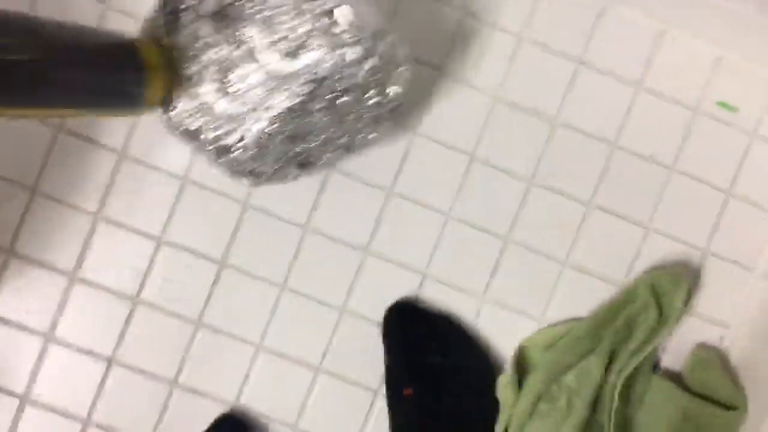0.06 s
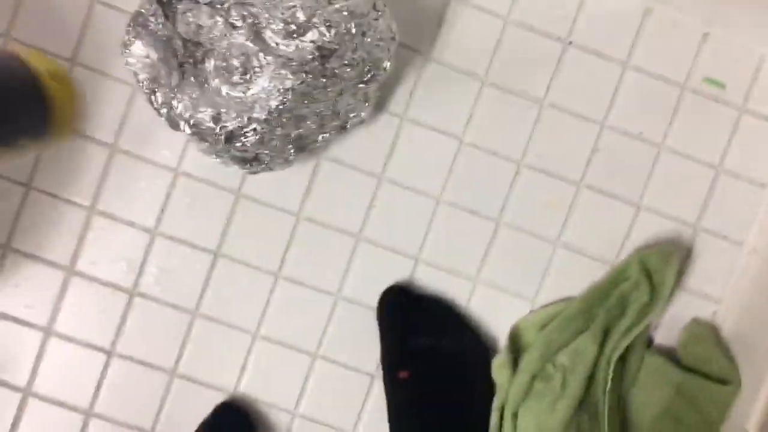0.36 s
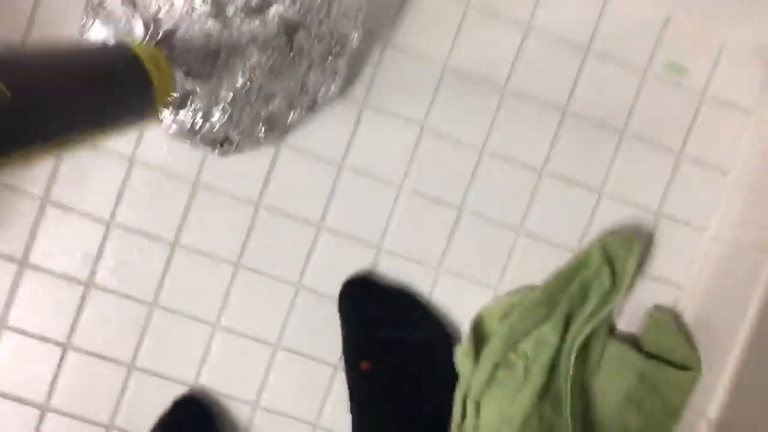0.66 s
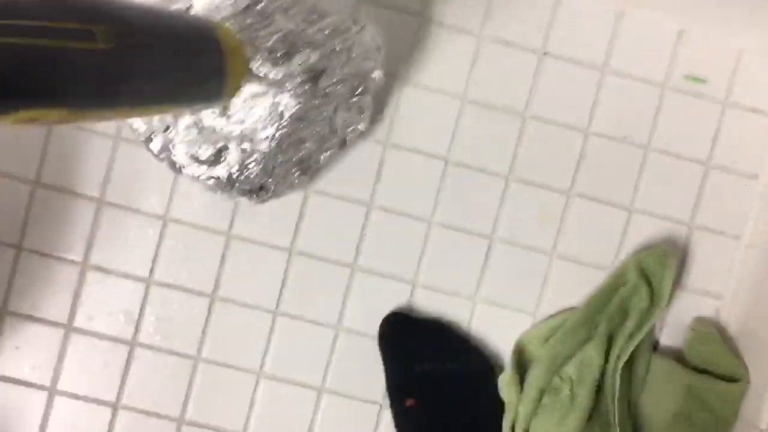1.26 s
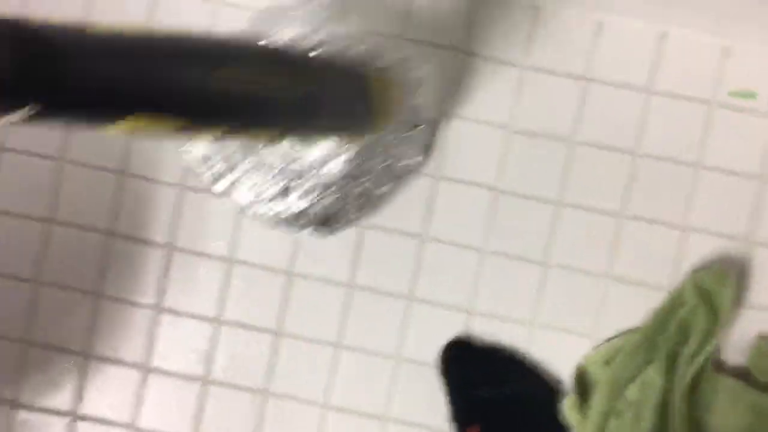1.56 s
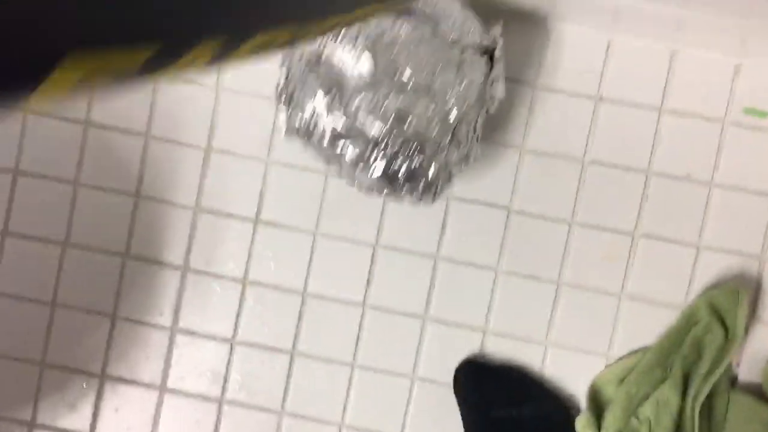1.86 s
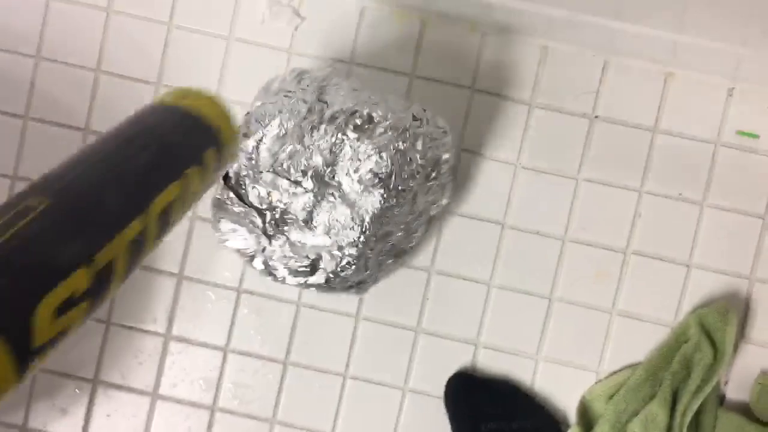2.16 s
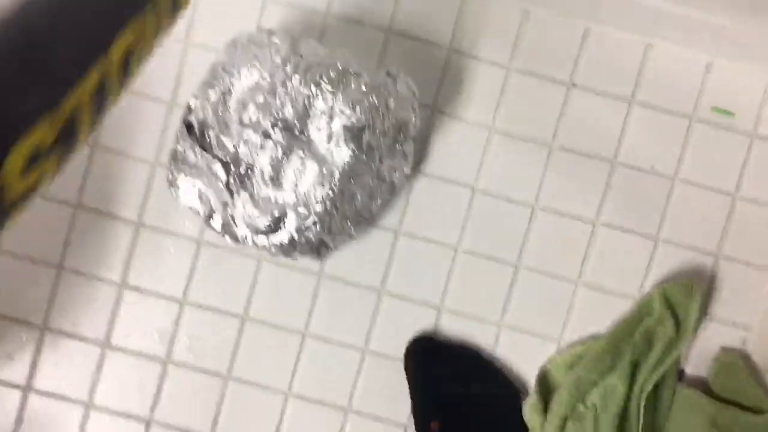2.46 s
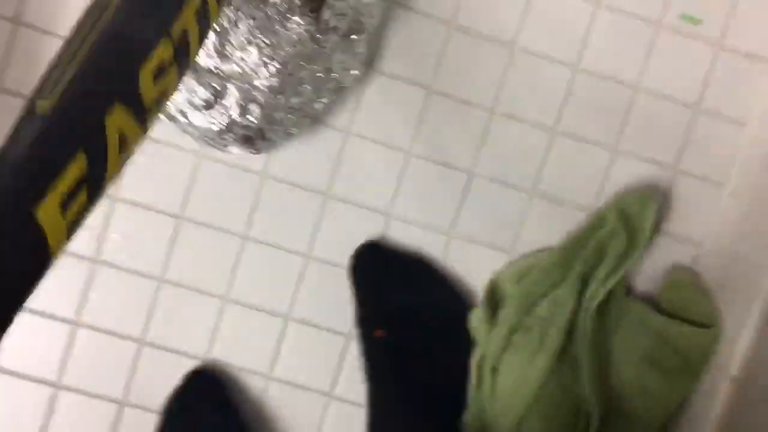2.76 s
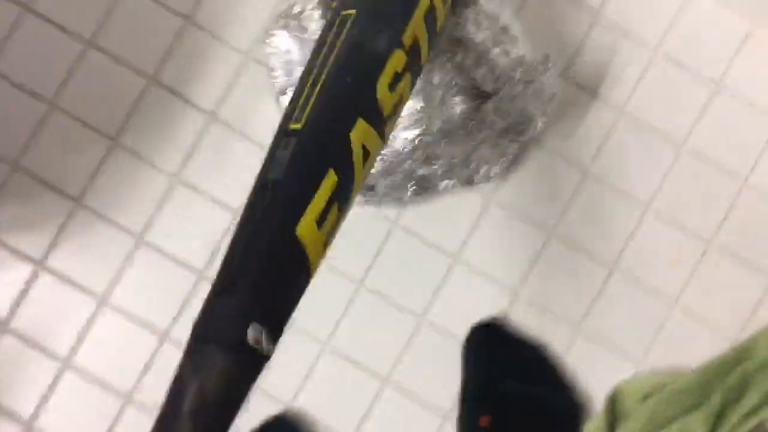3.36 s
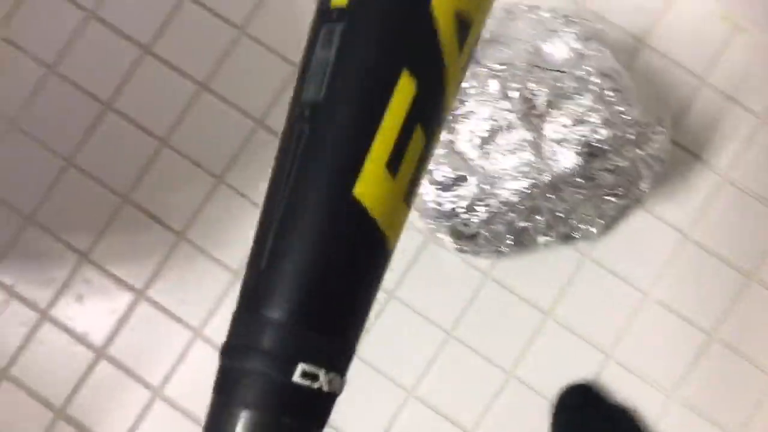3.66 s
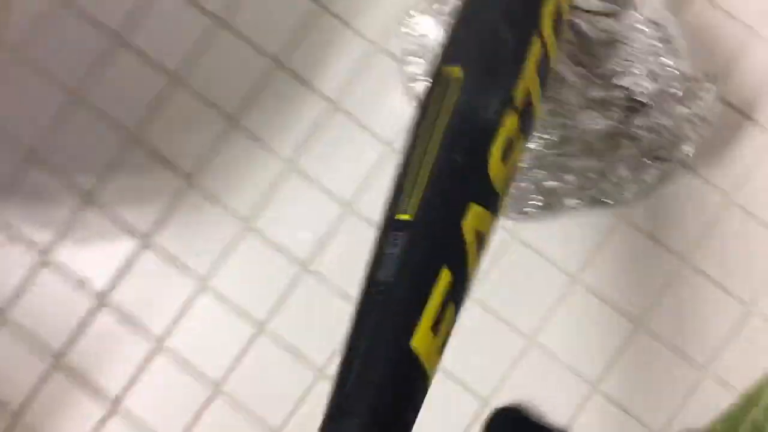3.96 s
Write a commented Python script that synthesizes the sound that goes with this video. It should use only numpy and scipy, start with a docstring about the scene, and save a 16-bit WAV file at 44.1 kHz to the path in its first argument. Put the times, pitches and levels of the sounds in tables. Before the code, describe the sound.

A bat hits a crumpled foil ball seven times on a tiled floor.

```python
"""In a small, hard, tiled room, a bat knocks a big ball of crumpled foil about on the floor.
Each blow crushes a few milliseconds' worth of creases and draws a hollow thud from the ball and the room.
Between blows the ball scrapes, rolls and tips over onto its flat sides, and single creases snap.
The bat rings briefly on the last three blows. A few soft hoots and a quiet rumble lie underneath."""
import sys
import numpy as np
from scipy import signal
from scipy.fft import rfft, irfft
from scipy.io import wavfile

SR = 44100
rng = np.random.default_rng(int(sys.argv[2]) if len(sys.argv) > 2 else 0)


def dump(signal):
    """Clip the signal to [-1, 1] and save it as 16-bit WAV at the path in sys.argv[1]."""
    limited = np.clip(np.atleast_2d(signal).T, -1, 1)
    pcm = np.round(limited * 32767).astype(np.int16)
    wavfile.write(sys.argv[1], SR, pcm)


N = 176400
T = np.arange(N) / SR


def amp(db):
    """Turn decibels into a number to multiply by."""
    return 10 ** (np.asarray(db) / 20)


def unit(x):
    """Scale a sound to an average (rms) size of 1."""
    return x / np.sqrt(np.mean(x ** 2) + 1e-20)


def at_hz(table, hz):
    """Look up a frequency in a table, sliding between rows by octaves."""
    freqs, values = np.array(table, float).T
    return np.interp(np.log(np.maximum(hz, 1)), np.log(freqs), values)


def curve(table):
    """A volume that follows a table of (time [s], level [dB])."""
    return amp(np.interp(T, *np.array(table, float).T))


def fade(t, fade_s):
    """Die away by 60 dB in the fade time."""
    return np.exp(-np.log(1000) * t / fade_s)


def add(out, x, start):
    """Mix a sound in at its start time."""
    i = int(np.clip(start * SR, 0, N - 1))
    out[i:i + len(x)] += x[:N - i]


def colour(x, spectrum, tilt=0, size=4096):
    """Give a sound the tone of a table; tilt adds that many dB per octave above 500 Hz."""
    hz = np.maximum(np.fft.rfftfreq(size, 1 / SR), 1)
    gain = amp(at_hz(spectrum, hz) + tilt * np.log2(np.maximum(hz, 500)))
    # fold the filter so that it never rings before the sound arrives
    cepstrum = irfft(np.log(gain))
    cepstrum[1:size // 2] *= 2
    cepstrum[size // 2 + 1:] = 0
    response = irfft(np.exp(rfft(cepstrum)))
    return signal.fftconvolve(x, response / np.linalg.norm(response))


def clicks(n, per_s, spread_db):
    """Many tiny snaps of uneven size at random moments."""
    snaps = (rng.random(n) < per_s / SR) * np.sign(rng.standard_normal(n))
    sizes = amp(spread_db * np.clip(rng.standard_normal(n), -2, 2))
    return unit(snaps * sizes)


def ringing(notes, rise_s):
    """Fading notes of something struck, a little different in level and pitch each time."""
    t = T[:SR // 2]
    ring = 0
    for hz, db, fade_s in notes:
        louder, higher, phase = rng.standard_normal(3)
        tone = np.sin(2 * np.pi * (hz * (1 + 0.0039 * higher) * t + phase))
        ring += amp(db + 1.5 * louder) * tone * fade(t, fade_s)
    return ring * (1 - np.exp(-t / rise_s))


# tone of the room's background (frequency [Hz], level [dB])
AIR_TONE = [(12, -13), (24, -13), (35, 6.5), (48, -4.5), (75, 6), (105, -4.5), (180, -11), (330, -12.5),
            (700, -16.5), (1200, -20.5), (2200, -32), (5000, -44.5), (10000, -44.5), (16000, -57)]
def air():
    """The quiet, steady rumble of the room."""
    noise = colour(rng.standard_normal(N + SR), AIR_TONE)
    return amp(-58.5) * unit(noise[SR:SR + N])


# how slowly the echo dies (frequency [Hz], fade time [s])
ECHO_FADE = [(100, 9.5), (300, 0.56), (700, 0.35), (1800, 0.3346), (4800, 0.2351), (13000, 0.2142)]
# tone of the echo (frequency [Hz], level [dB])
ECHO_TONE = [(100, -1), (500, 1.5), (1200, 0), (3000, -1.5), (7000, -2), (14000, -12)]
ECHO_DELAY_S, ECHO_RISE_S = 0.00084, 0.0048
def tile_echo(size=32768):
    """Sound bounces between the tiles in a new random pattern each time; the treble dies first."""
    t = T[:size]
    noise, hz = rfft(rng.standard_normal(size)), np.fft.rfftfreq(size, 1 / SR)
    centres = np.geomspace(100, 16000, 9)
    onset = 1 - np.exp(-np.maximum(t - ECHO_DELAY_S, 0) / ECHO_RISE_S)
    echo = 0
    for centre, pick in zip(centres, np.eye(len(centres))):
        band = irfft(noise * np.interp(hz, centres, pick))
        swell = onset * fade(t, at_hz(ECHO_FADE, centre))
        echo += band * swell / np.linalg.norm(swell) * amp(at_hz(ECHO_TONE, centre))
    return echo


# how strongly the foil scrapes (time [s], level [dB])
SCRAPE_LEVEL = [(0, -93), (.12, -62), (.17, -57), (.225, -50.5), (.26, -76), (.32, -59.5), (.39, -101),
                (.66, -70), (.78, -71.5), (.98, -70.5), (1.0, -90.5), (1.68, -83.5), (1.73, -77),
                (1.79, -49.5), (1.855, -42.5), (1.93, -58), (2.02, -58), (2.14, -57), (2.2, -47.5),
                (2.265, -50), (2.31, -64), (2.5, -80.5), (3.4, -81), (3.5, -68), (3.76, -71.5), (3.92, -63),
                (4, -60)]
# tone of the scraping (frequency [Hz], level [dB])
SCRAPE_TONE = [(150, -68), (600, 5), (1200, 4), (2000, 6), (3200, 4.5), (4800, 1.5), (6000, 2),
               (7500, -4.5), (9200, -2.5), (10300, -10), (12500, -7.5), (15500, -19.5)]
# how strongly the rolling ball rumbles (time [s], level [dB])
ROLL_LEVEL = [(0, -70), (.15, -50), (.3, -54), (.45, -60), (.55, -69), (.85, -60), (1.05, -67.5),
              (1.3, -58), (1.6, -90), (1.84, -56), (1.95, -65), (2.05, -43), (2.2, -66), (2.4, -53),
              (2.6, -73.5), (2.85, -50.5), (3.02, -51.5), (3.15, -70.5), (3.7, -64.5), (3.95, -64)]
# tone of the rolling (frequency [Hz], level [dB])
ROLL_TONE = [(60, -19), (200, 4.5), (350, -17), (600, -8), (950, -2), (1400, -10), (2200, -32),
             (5000, -32.5)]
def rolling():
    """Foil scrapes finely on tile over the coarser patter of rolling, and the room echoes both."""
    scrape = colour(clicks(N, per_s=15000, spread_db=5.5) * curve(SCRAPE_LEVEL), SCRAPE_TONE)
    rumble = colour(clicks(N, per_s=900, spread_db=1) * curve(ROLL_LEVEL), ROLL_TONE)
    direct = (amp(1.5) * scrape + amp(-3.5) * rumble)[:N]
    return direct + amp(-7.5) * signal.fftconvolve(direct, tile_echo())[:N]


def crush(length, spectrum, echo_db, tilt=0):
    """Snaps swell as the foil is pressed in and die as it lets go, followed by their echo."""
    t = T[:3000]
    press = np.minimum(t / (0.33 * length), 1)
    release = np.exp(-np.maximum(t - length / 2, 0) / (0.8 * length))
    swell = press * release
    snaps = clicks(len(t), per_s=14000, spread_db=0.5)
    direct = unit(snaps * swell) * np.sqrt(np.mean(swell ** 2))
    out = amp(echo_db) * tile_echo() * np.linalg.norm(direct)
    add(out, direct, 0)
    return colour(out, spectrum, tilt)


# tone of crackling foil (frequency [Hz], level [dB])
FOIL_TONE = [(150, -19), (500, -6), (1000, -3.5), (1500, -0.5), (2600, 0), (3800, -0.5), (4800, -4),
             (5900, -0.5), (7200, -2.5), (9000, -1), (10300, -6), (12500, -3.5), (15500, -13.5)]
# lone crackles (time [s], level [dB], crush length [s], brightness [dB per octave])
CREASE_SNAPS = [(.0405, -37, .004, 0), (.117, -51, .004, -2.5), (.442, -57, .006, -6),
                (.476, -66, .005, -4.5), (.685, -53.5, .005, -2), (1.099, -32, 0.0098, -3.5),
                (1.181, -48, .008, -2.5), (1.614, -36.5, .004, -1.5), (1.669, -38, 0.0047, -3),
                (1.853, -45, .004, -0.5), (2.385, -52.5, 0.012, -7.5), (2.46, -50, 0.0049, -6.5),
                (2.556, -53.5, 0.0036, -10.5), (2.606, -67, .003, -5.5), (2.928, -47, 0.0084, -6),
                (3.014, -54, 0.012, -5.5), (3.311, -66, 0.0048, -1), (3.779, -57, .003, 2),
                (3.801, -71, 0.0016, -9)]
def creases():
    """Single creases in the foil snap or graze."""
    out = np.zeros(N)
    for start, db, length, tilt in CREASE_SNAPS:
        add(out, amp(db) * crush(length, FOIL_TONE, echo_db=0.5, tilt=tilt), start)
    return out


# how hard the thud drives the room (frequency [times the ball's note], level [dB])
THUD_TONE = [(.35, -6.5), (.7, -1), (1, 1), (1.3, -5), (1.7, -9.5), (2.5, -13), (5, -35)]
# the room's own low notes (pitch [Hz], level [dB], fade time [s])
ROOM_NOTES = [(77.2, -7, 0.18), (145.3, -10, 0.32), (175.7, -9, .38), (197.8, -5.5, 0.25), (231, -7, 0.43),
              (272.4, -10, 0.31), (412, -10.5, .42), (478.4, -15.5, 0.47), (536, -17.5, 0.47),
              (579.4, -7, 0.3), (642, -23.5, 0.22), (908, -11.5, 0.27), (1004, -12.5, 0.33),
              (1084, -11, .3)]
def thud(note_hz, thud_db, knock_tone, knock_db):
    """The ball sounds its hollow note; thud or knock, whichever is stronger, sets each room note going."""
    t = T[:SR // 2]
    onset = 1 - np.exp(-t / 0.0025)
    ball = np.sin(2 * np.pi * note_hz * t) * onset * fade(t, fade_s=0.069)
    thud_tone = [(ratio * note_hz, db) for ratio, db in THUD_TONE]
    notes = []
    for hz, db, fade_s in ROOM_NOTES:
        drive_db = max(thud_db + at_hz(thud_tone, hz), knock_db + at_hz(knock_tone, hz))
        notes.append((hz, db + drive_db, fade_s))
    room = ringing(notes, rise_s=0.0033)  # the room takes a moment to fill
    return amp(thud_db + 5) * ball + amp(-2) * room


# tone of the knock (frequency [times the knock's pitch], level [dB])
KNOCK_TONE = [(.15, -21), (.42, -4), (.62, -2), (.8, -1.5), (1, 2.5), (1.25, -3.5), (1.8, -4), (2.4, -6.5),
              (3.5, -16), (8, -45.5)]
def impacts(table, thud_lag_s, echo_db):
    """The ball's skin crunches first, then its packed core knocks, then comes the hollow thud."""
    out = np.zeros(N)
    for start, crunch_db, knock_db, thud_db, length, tilt, knock_hz, note_hz in table:
        knock_tone = [(ratio * knock_hz, db) for ratio, db in KNOCK_TONE]
        add(out, amp(crunch_db) * crush(length, FOIL_TONE, echo_db, tilt), start)
        add(out, amp(knock_db) * crush(length, knock_tone, echo_db), start + 0.2967 * thud_lag_s)
        add(out, thud(note_hz, thud_db, knock_tone, knock_db), start + thud_lag_s)
    return out


# the bat meets the ball (time [s], crunch [dB], knock [dB], thud [dB], crush length [s],
# brightness [dB per octave], knock pitch [Hz], thud pitch [Hz])
BAT_BLOWS = [(.0435, -25.5, -31, -29.5, 0.0094, -2, 470, 208.5),
             (.5775, -26, -31, -29.5, 0.0095, -1.1, 643, 181),
             (1.1008, -26, -28.5, -28, 0.0067, -1.5, 470, 225),
             (1.6165, -25.5, -26, -25.5, 0.0079, -0.65, 926, 214),
             (2.7728, -23.5, -33.5, -21, 0.0081, -0.5, 1430, 164.8),
             (3.3326, -18, -23.5, -21.5, 0.0037, -0.3, 663, 189),
             (3.9678, -16.5, -25.5, -20.5, 0.0063, -0.65, 700, 163.6)]
def blows():
    """The bat crushes the foil, and the thud follows about 6 ms after the first touch."""
    return impacts(BAT_BLOWS, thud_lag_s=0.006244, echo_db=0)


# the ball meets the floor (time [s], crunch [dB], knock [dB], thud [dB], crush length [s],
# brightness [dB per octave], knock pitch [Hz], thud pitch [Hz])
FLOOR_BUMPS = [(.2295, -43, -37, -35.5, 0.0084, -4, 617, 205),
               (.339, -43.5, -37.5, -38.5, 0.0058, -5.5, 667, 196),
               (1.738, -42.5, -44, -54, 0.0065, -3.5, 900, 201),
               (1.757, -72, -41, -70, .009, -11, 960, 200), (2.056, -39, -38, -70, 0.0089, -4, 980, 200),
               (2.093, -37, -37, -33, .011, -4, 830, 214), (2.271, -36.5, -34, -33, 0.0051, -3, 980, 194)]
def bumps():
    """The ball tips over and drops gently onto one of its flat sides."""
    return impacts(FLOOR_BUMPS, thud_lag_s=0.002, echo_db=-2.5)


# brief low tones (time [s], pitch [Hz], level [dB], length [s])
LOW_HOOTS = [(.83, 237, -53.5, .07), (3.514, 268, -41, 0.029), (3.555, 262, -49.5, 0.049),
             (3.587, 257, -52.5, 0.033)]
def hoots():
    """Soft, short hoots swell and fade between the blows."""
    out = np.zeros(N)
    for start, hz, db, length in LOW_HOOTS:
        t = T[:int(length * SR)]
        swell = np.sin(np.pi * t / length)
        add(out, amp(db) * swell * np.sin(2 * np.pi * hz * t), start)
    return out


# blows that make the bat ring (time [s], level [dB])
BAT_RINGS = [(2.774, -26), (3.334, -18.5), (3.969, -17)]
# the bat's own notes (pitch [Hz], level [dB], fade time [s])
BAT_NOTES = [(2130, -8.5, .06), (3530, 1.5, 0.02), (5870, 1.5, 0.029), (5920, 2.5, 0.026),
             (8630, -5.5, .05)]
def bat_ring():
    """The thick end of the bat gives a short, high ring when its side strikes."""
    out = np.zeros(N)
    for start, db in BAT_RINGS:
        add(out, amp(db) * ringing(BAT_NOTES, rise_s=0.002), start)
    return out


def scene():
    """Add all the sounds in the room together in one channel."""
    hits = blows() + bumps() + bat_ring()
    return (hits + creases() + rolling() + hoots() + air())[None]


TOP_HZ = 16200
def record(dry):
    """Cut away the very highest treble."""
    return signal.sosfilt(signal.ellip(10, .2, 80, TOP_HZ, fs=SR, output="sos"), dry)


dry = scene()
out = record(dry)
dump(out)
```